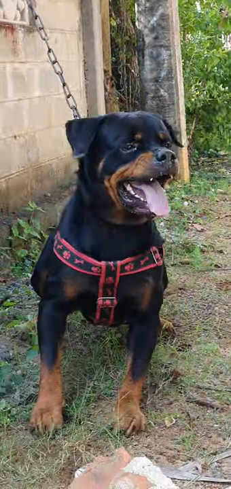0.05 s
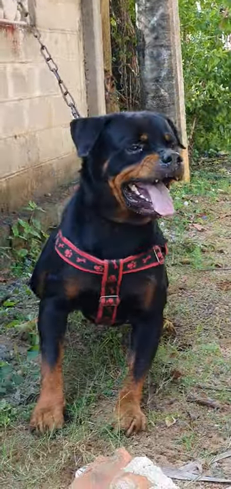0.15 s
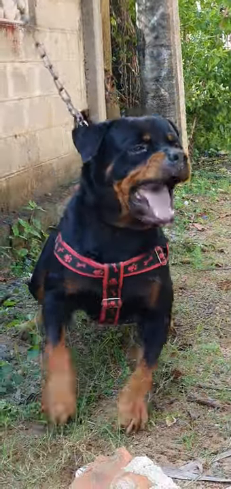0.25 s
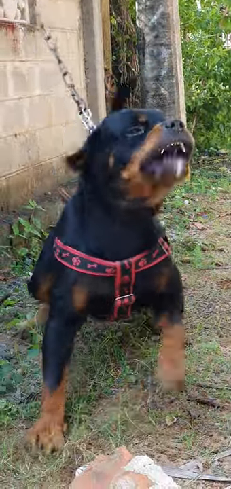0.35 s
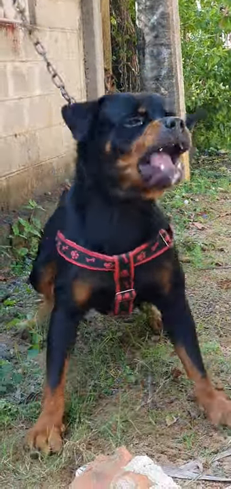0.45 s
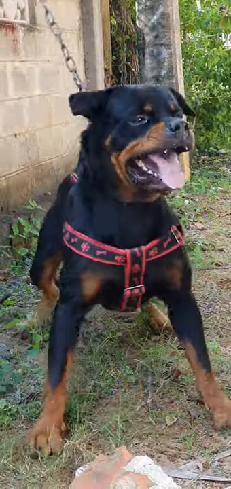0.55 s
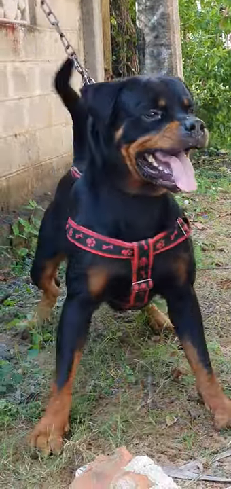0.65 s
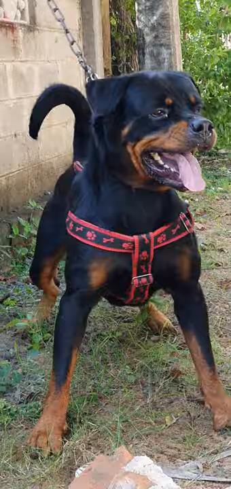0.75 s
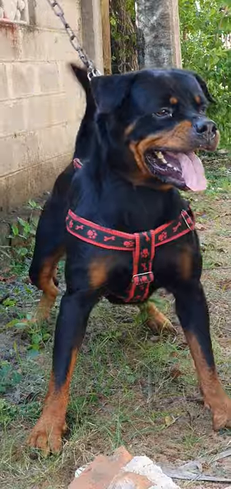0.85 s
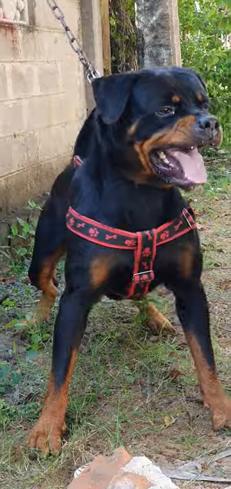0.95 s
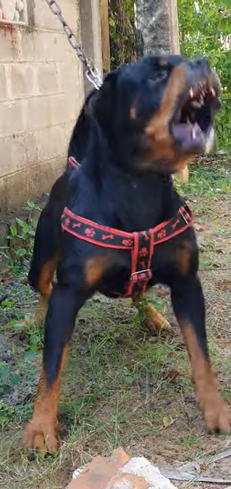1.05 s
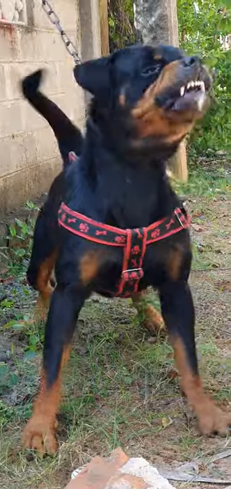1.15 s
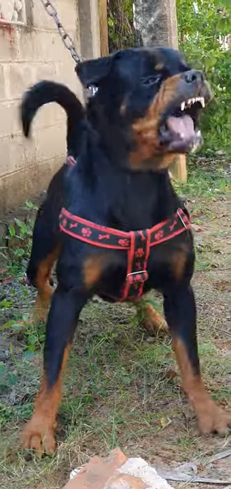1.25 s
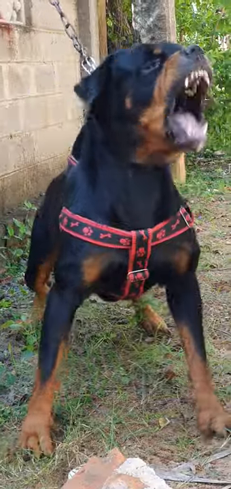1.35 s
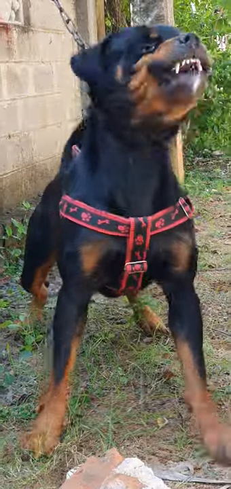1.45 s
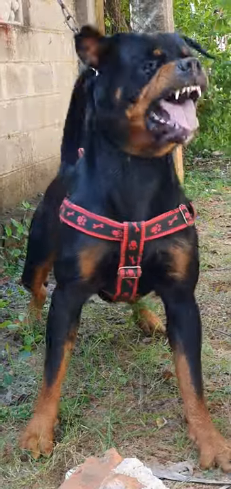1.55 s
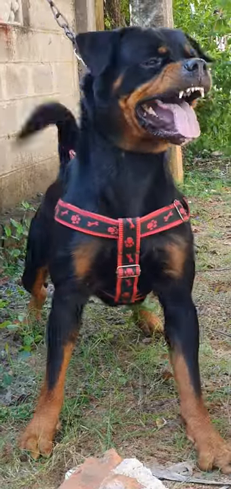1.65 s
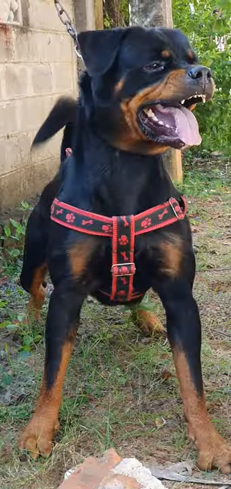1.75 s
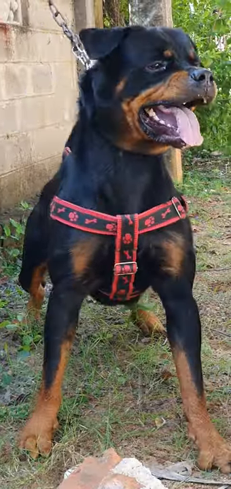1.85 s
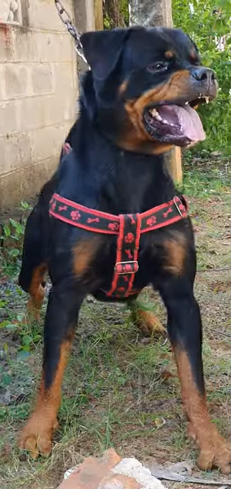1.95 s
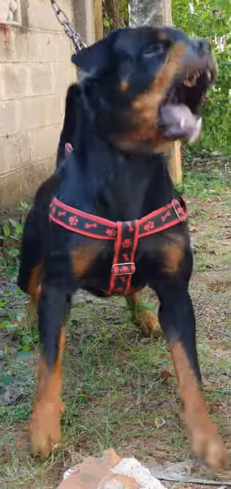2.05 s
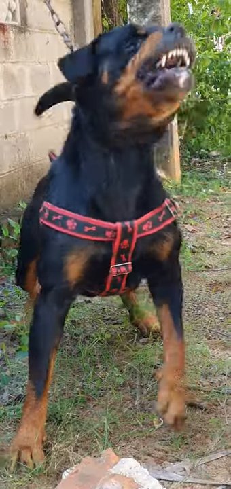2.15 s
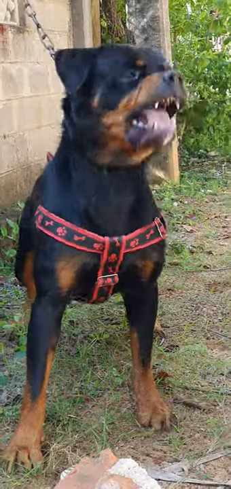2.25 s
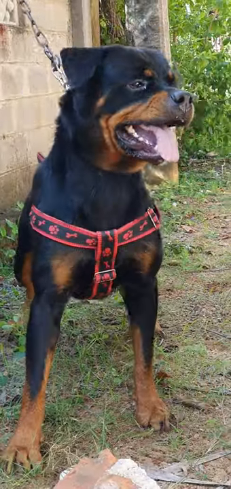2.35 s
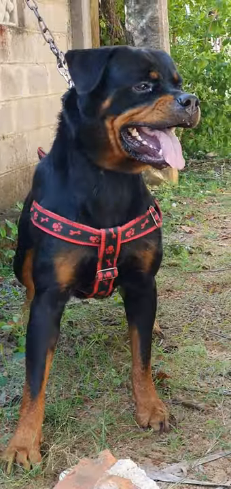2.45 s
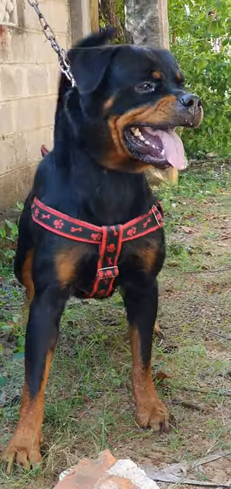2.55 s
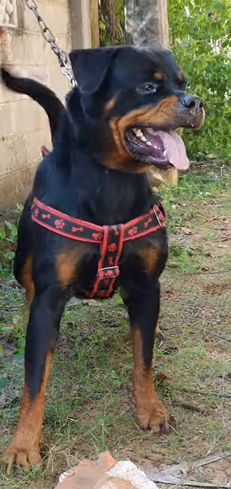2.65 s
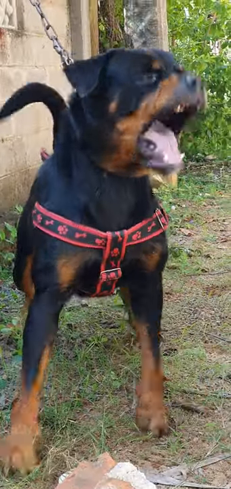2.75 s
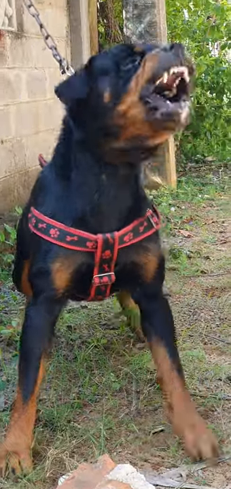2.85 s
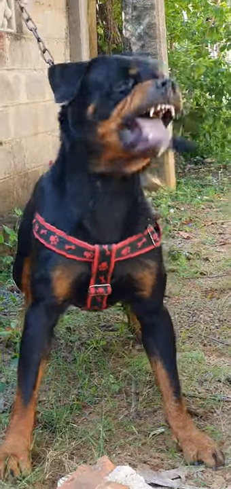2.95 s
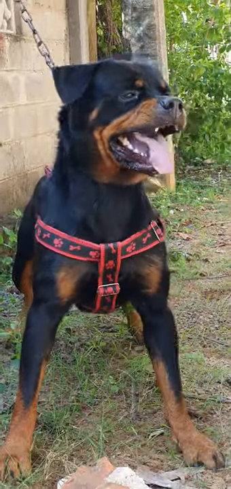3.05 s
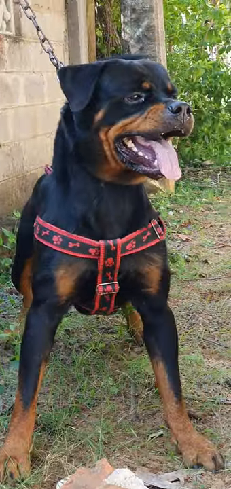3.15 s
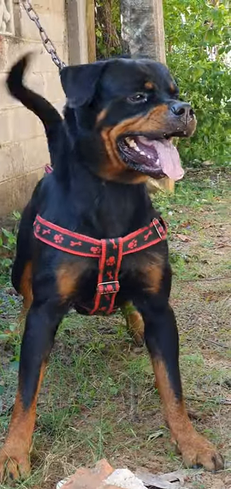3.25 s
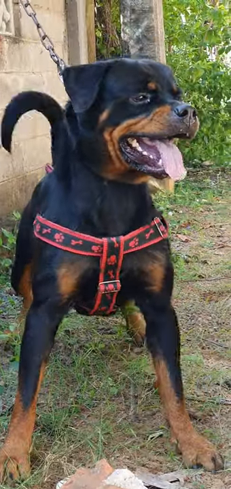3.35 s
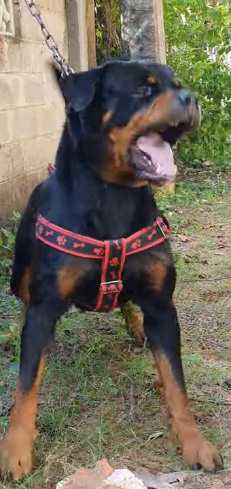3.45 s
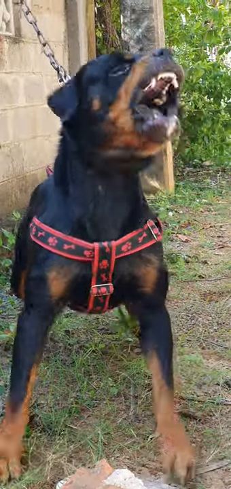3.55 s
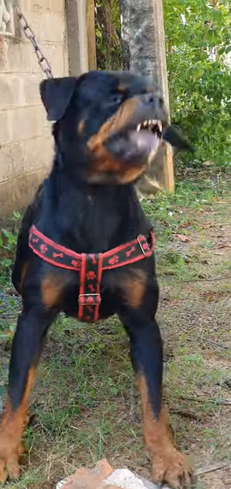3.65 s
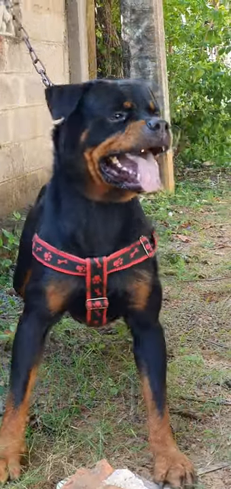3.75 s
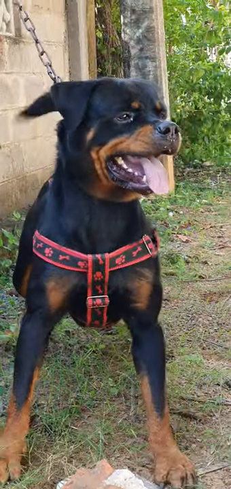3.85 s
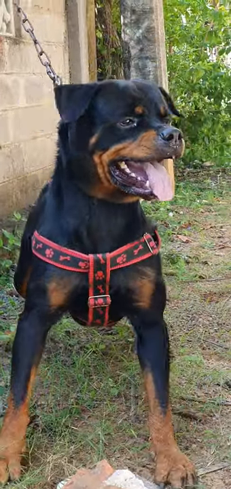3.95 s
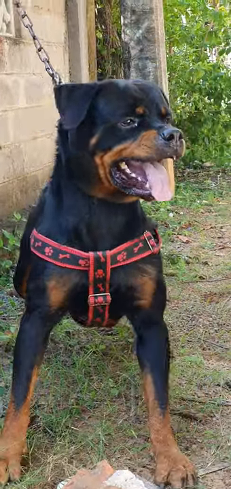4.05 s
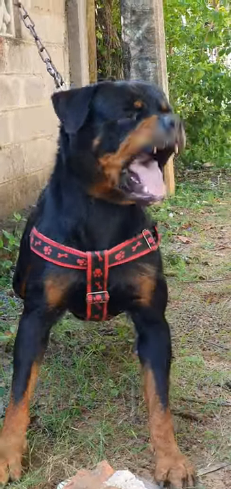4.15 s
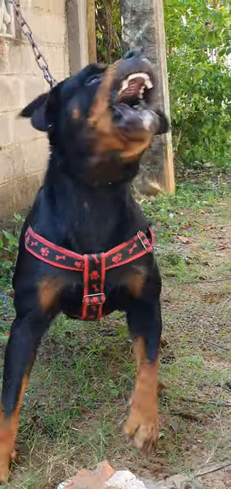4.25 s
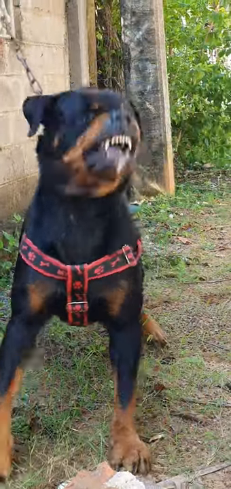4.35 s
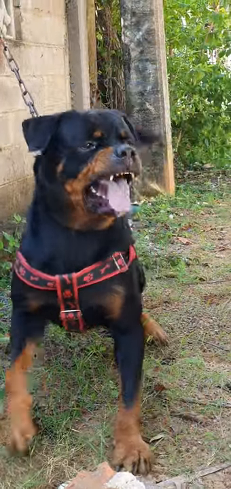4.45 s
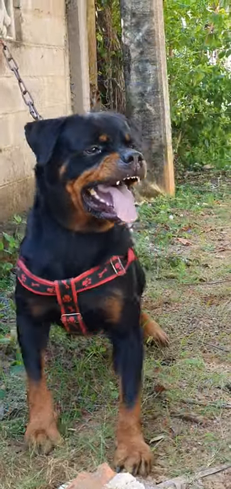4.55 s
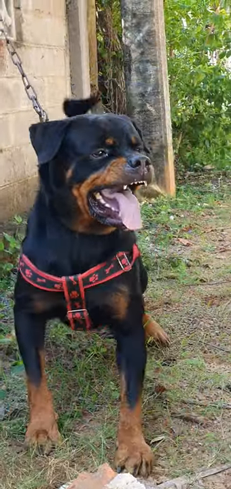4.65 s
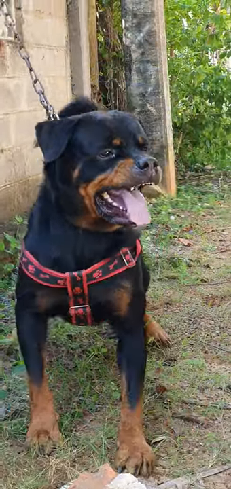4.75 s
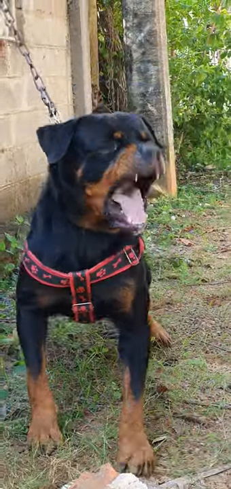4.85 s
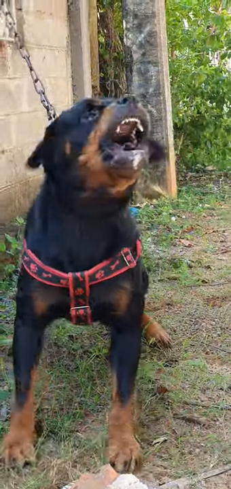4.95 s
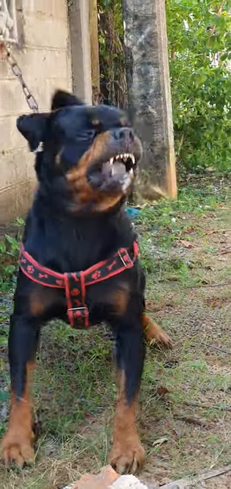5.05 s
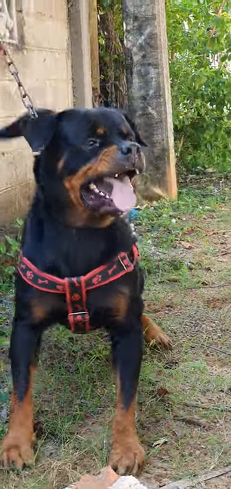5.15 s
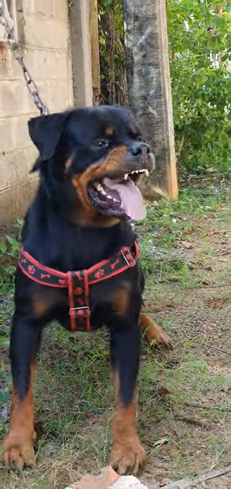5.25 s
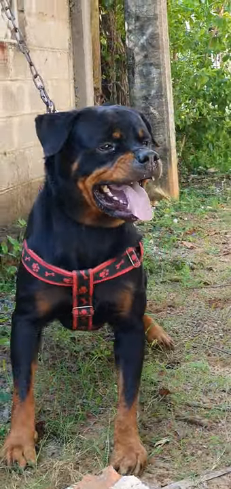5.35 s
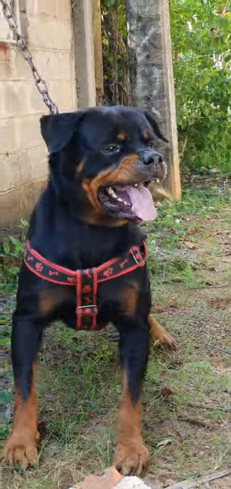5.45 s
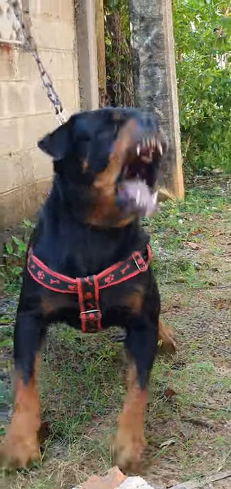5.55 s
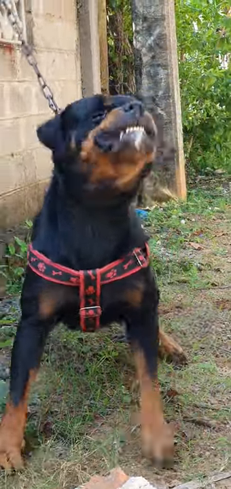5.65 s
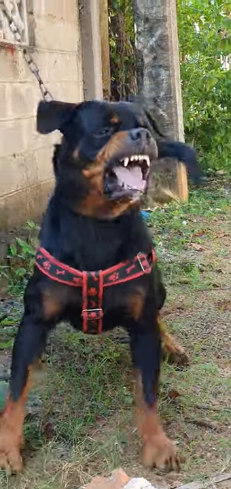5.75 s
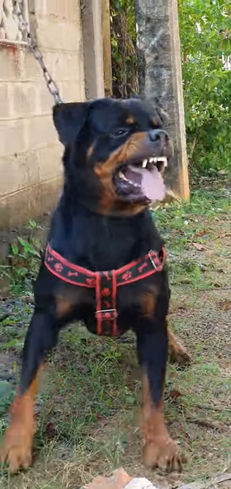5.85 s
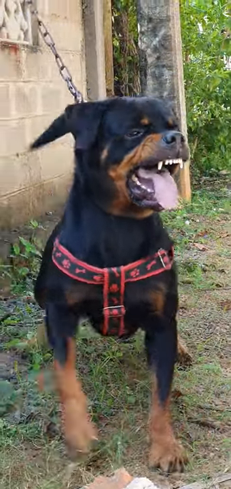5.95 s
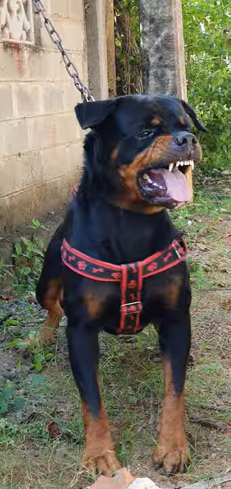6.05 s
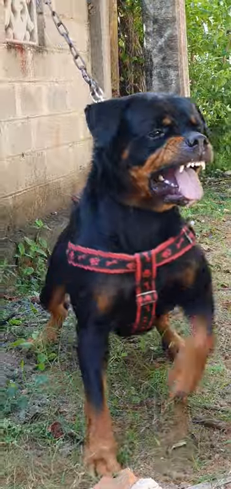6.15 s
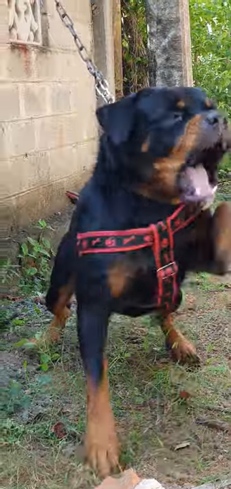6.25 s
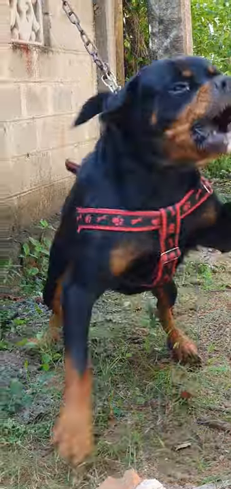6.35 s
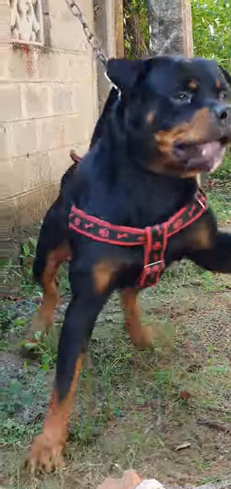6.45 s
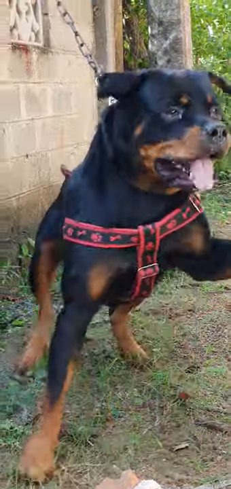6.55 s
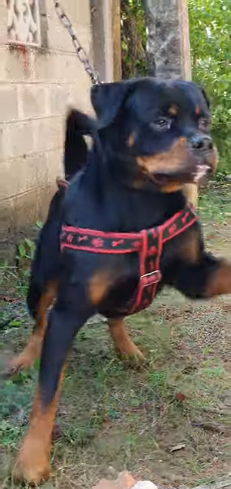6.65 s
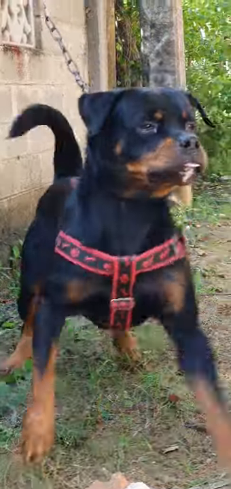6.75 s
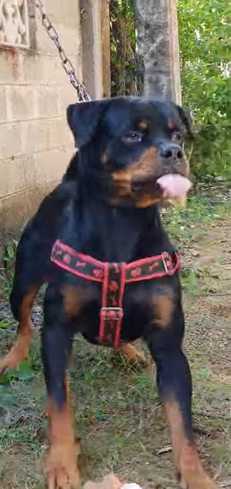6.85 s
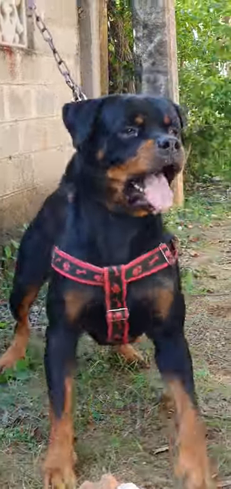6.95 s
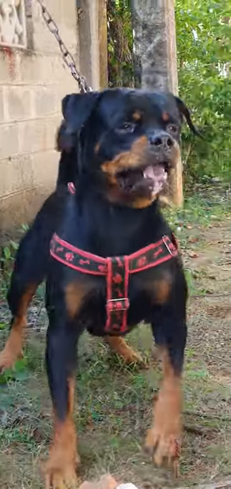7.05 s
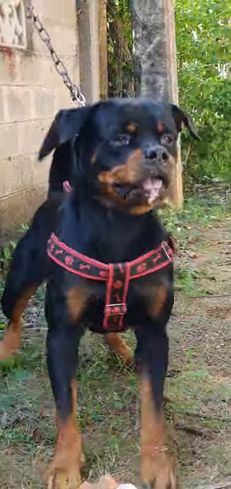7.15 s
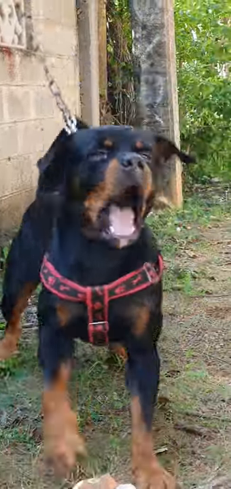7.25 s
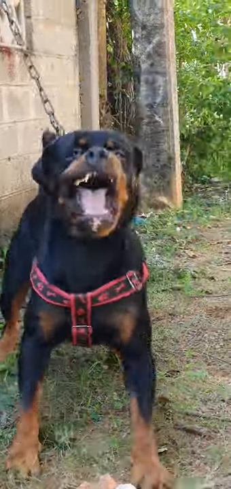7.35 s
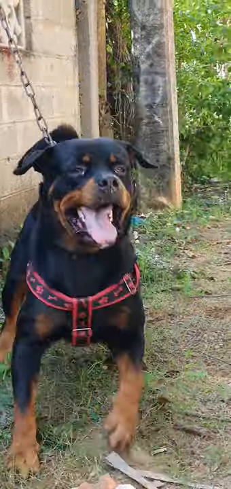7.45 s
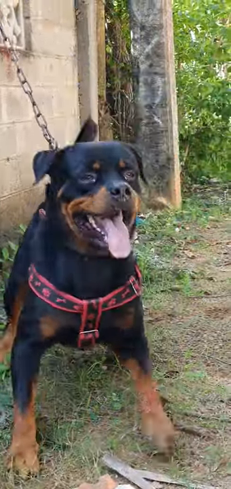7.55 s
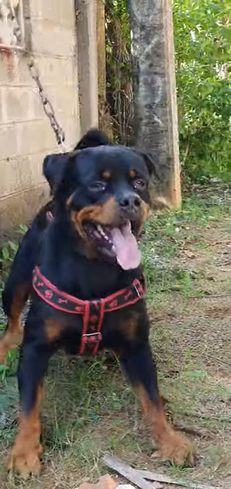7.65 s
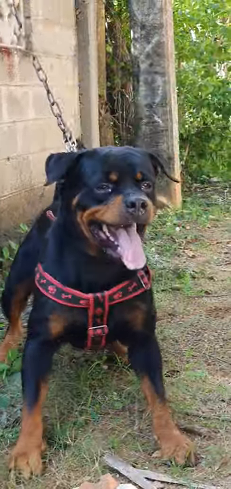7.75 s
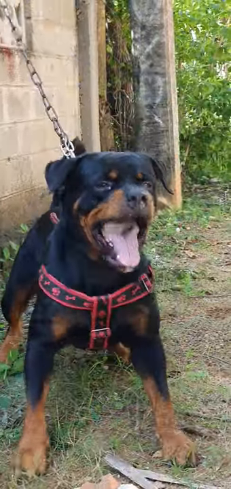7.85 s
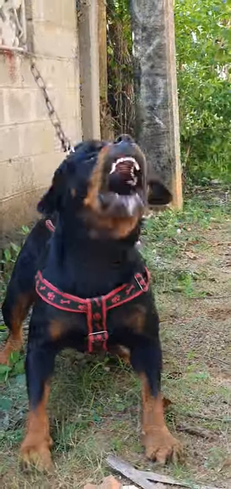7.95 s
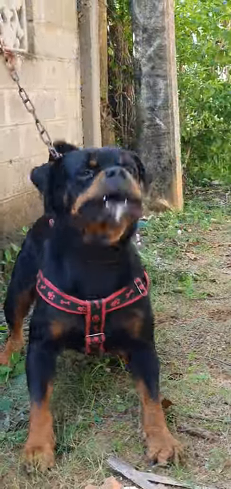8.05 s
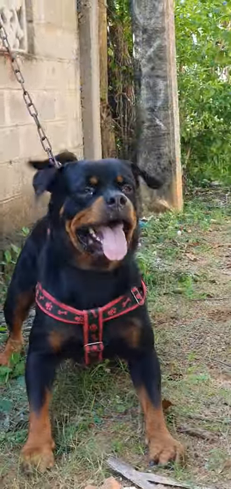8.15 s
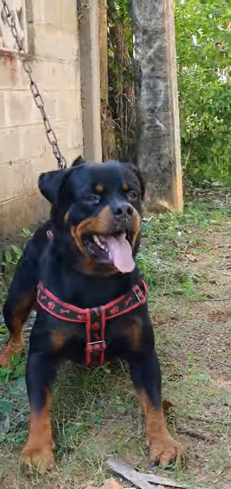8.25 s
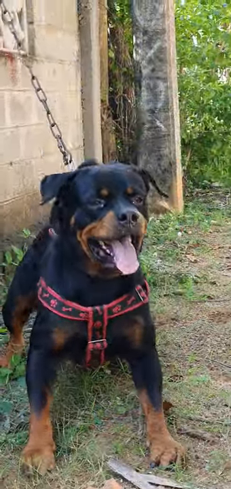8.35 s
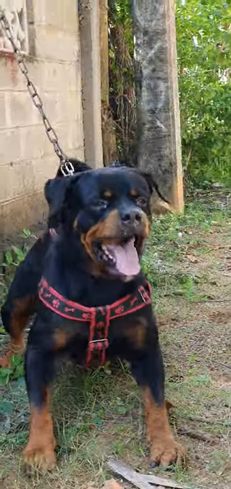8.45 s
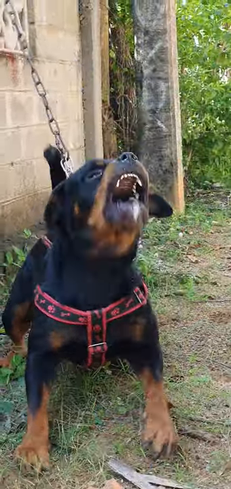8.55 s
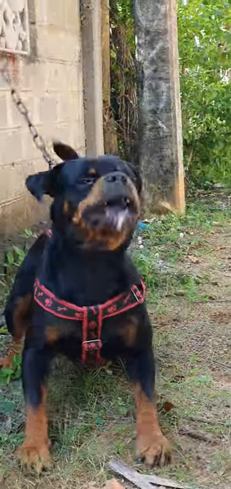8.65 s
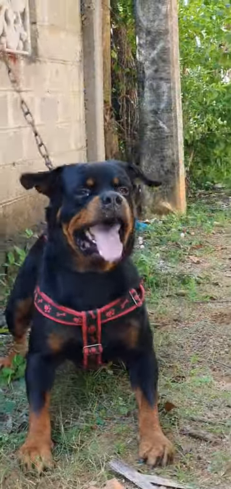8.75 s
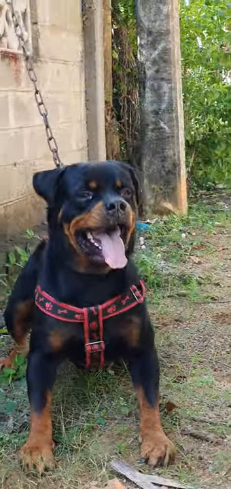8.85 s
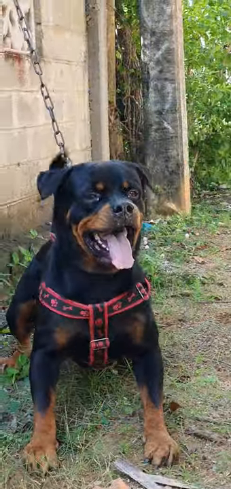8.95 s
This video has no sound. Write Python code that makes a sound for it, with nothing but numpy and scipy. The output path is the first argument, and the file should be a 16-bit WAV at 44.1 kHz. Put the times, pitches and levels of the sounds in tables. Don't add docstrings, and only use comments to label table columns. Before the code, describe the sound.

The scene opens on the tail of a high yelp, then a large dog close by barks hoarsely at about 0.3 seconds. Another bark follows at 1.0 and a quick one at 1.3, running into two clear yelps from a second dog by 1.8. The big dog continues at roughly 2.0, 2.7 and 3.5, each short bark rising, closing off and usually followed by a raspy gasp. Low growls murmur near 0.7 and 3.3. From 3.8 to 4.5 yelps cluster around a bark, then both dogs alternate and overlap through 9 seconds, with the last strong bark at 8.5 and a weak yelp at the end. A distant dog yaps faintly throughout and whines thinly near 0.1, 2.3 to 3.3 and 4.6. Walls return a short fading echo over gentle leaf hiss, low rumble and a far idling engine.

```python
import sys
import numpy as np
from scipy import signal
from scipy.fft import rfft, irfft
from scipy.io import wavfile
from scipy.ndimage import uniform_filter1d, minimum_filter1d

SR = 44100
rng = np.random.default_rng(int(sys.argv[2]) if len(sys.argv) > 2 else 0)


def to_linear_factor(level_db):
    exponent = np.asarray(level_db, float) / 20
    return 10 ** exponent


def master(y):
    cut = np.clip(np.atleast_2d(y).T, -1, 1)
    pcm = np.round(cut * 32767)
    wavfile.write(sys.argv[1], SR, pcm.astype(np.int16))


N = 396900

# start_s, rise_s (to the highest pitch), fall_s (from there to the end), level_db, top_pitch_hz
BIG_BARKS = [(0.27, .09, .13, -9.5, 547), (0.984, .085, .16, -7.5, 501), (1.303, .098, .075, -7, 544),
             (2.018, 0.096, 0.13, -8, 547.7), (2.74, 0.086, 0.14, -8.5, 554.3),
             (3.456, 0.081, 0.12, -6.5, 527), (4.181, 0.079, .12, -11.5, 491.4),
             (4.872, .08, 0.12, -8, 533.5), (5.539, .08, .1, -9, 534.8), (6.254, 0.1, 0.089, -9, 472.5),
             (7.234, 0.065, .11, -11, 450.5), (7.873, .075, 0.13, -10.5, 479.3),
             (8.496, 0.094, 0.084, -9, 542)]
# frequency_hz, level_db (per Hz)
SMALL_TEETH = [(2060, -7.5), (3500, 1.5), (4700, -13), (5880, 3), (7500, -1.5), (10100, -13.5), (12100, -3),
               (15600, -19.5)]


def in_time(table):
    s, *columns = np.transpose(table)
    first = max(int(s[0] * SR), 0)
    t = np.arange(first, min(int(s[-1] * SR), N)) / SR
    return first, len(t), [np.interp(t, s, c) for c in columns]


def colour(x, spectrum):
    size = x.shape[-1]
    hz = np.arange(size // 2 + 1) * SR / size + 1
    points = np.array(spectrum)
    gain_db = np.interp(np.log(hz), np.log(points[:, 0]), points[:, 1])
    return irfft(rfft(x) * to_linear_factor(gain_db), size)


def cut(x, hz, kind):
    return signal.sosfilt(signal.butter(4, hz, kind, fs=SR, output="sos"), x)


def wobble(size, hz):
    slow = cut(rng.standard_normal(size + 2000), hz, "low")[2000:]
    return slow / slow.std()


def evened(x):
    return x / np.sqrt(uniform_filter1d(x ** 2, size=1100) + 1e-12)


def yard():
    # frequency_hz, level_db (per Hz)
    yard_air = [(12, -38), (20, -5), (116, -7.5), (202, -10.5), (465, -21.5), (550, -14.5), (687, -16.5),
                (790, -23.5), (934, -20), (2280, -18.5), (2690, -27), (3180, -33), (15600, -54)]
    # frequency_hz, level_db (rms)
    engine = [(48.4, -78.5), (102.3, -80), (129.2, -57)]
    shared, left, right = colour(rng.standard_normal((3, N)), yard_air)
    own = cut(np.array([left, right]), 410, "high")
    air = shared + .8 * own + .2 * np.array([left, -left])
    air *= to_linear_factor(1.2 * wobble(N, 4))
    drone = np.zeros(N)
    for hz, db in engine:
        turns = hz * np.cumsum(1 + 0.027 * wobble(N, 3)) / SR
        drone += to_linear_factor(db - 3.5) * np.sin(2 * np.pi * turns)
    return to_linear_factor(-49) * air / air.std() + drone


def placed(x, wet_db):
    t60_s = 0.48
    t = np.arange(int(.7 * SR)) / SR
    tail = rng.standard_normal((2, len(t))) * (t > .02) * to_linear_factor(wet_db - 60 * t / t60_s)
    tail = cut(tail, 6000, "low") / np.sqrt(t60_s * SR / 8.0)
    return x + signal.fftconvolve(x, tail, axes=1)[:, :N]


def hum(calls, overtones_db, jitter, flutter_db):
    out = np.zeros(N)
    for table in calls:
        first, size, (pitch, level_db) = in_time(table)
        phase = 2 * np.pi * np.cumsum(pitch * (1 + jitter * wobble(size, 28))) / SR
        tone = sum(to_linear_factor(db) * np.sin((k + 1) * phase) for k, db in enumerate(overtones_db))
        fade = signal.windows.tukey(size, .3)
        level = to_linear_factor(level_db + flutter_db * wobble(size, 37.5))
        out[first:first + size] += np.sqrt(2) * fade * level * tone
    return out


def held(calls, hz_per_s, db_per_s):
    notes = []
    for s, long, hz, db in calls:
        half_db = db_per_s * long / 2
        notes.append([(s, hz, db - half_db), (s + long, hz + hz_per_s * long, db + half_db)])
    return notes


def arches(calls, course, bright_db):
    stage, level_db, share, open_db, *jaw_share = np.transpose(course)
    tables = []
    for (s, rise, fall, db, hz, *gape), bright in zip(calls, bright_db):
        time_s = s + rise + stage * np.where(stage < 0, rise, fall)
        columns = [time_s, db + level_db, hz * share, bright + open_db]
        columns += [jaw_hz * part for jaw_hz, part in zip(gape, jaw_share)]
        tables.append(np.transpose(columns))
    return tables


def jaw(x, centre_hz, width_hz, boost):
    out, state, r = np.zeros_like(x), np.zeros(2), np.exp(-np.pi * width_hz / SR)
    for i in range(0, len(x), 128):
        poles = [1, -2 * r * np.cos(2 * np.pi * centre_hz[i] / SR), r * r]
        zeros = [(1 - r * r) / 2, 0, (r * r - 1) / 2]
        out[i:i + 128], state = signal.lfilter(zeros, poles, x[i:i + 128], zi=state)
    return x + boost * out


def bark(table, throat, at_top, rising, falling, jitter, halving, teeth, hiss_db, chest_db):
    first, size, (level_db, pitch, bright_db, *jaw_hz) = in_time(table)
    pitch = uniform_filter1d(pitch, size=900, mode="nearest")
    level_db = level_db + 1.1 * wobble(size, 35)

    below_top = 1 - pitch / pitch.max()
    late = np.clip((np.arange(size) - pitch.argmax()) / SR / .02 + 1, 0, 1)
    hoarse = at_top + (1 - late) * rising * below_top + late * falling * np.sqrt(below_top + .015)
    hoarse = np.clip(hoarse, 0, .9)

    steady = 2 * np.pi * np.cumsum(pitch) / SR
    phase = steady + 2 * np.pi * np.cumsum(pitch * jitter * hoarse * wobble(size, 118.0)) / SR
    order = np.arange(1, 15)[:, None]
    partials = np.cos(order * phase + 0.3514 * order ** 2) * (order * pitch < 4000)
    buzz = np.sum(partials, axis=0) * np.sqrt(2 * pitch / 4000)
    buzz += cut(buzz * halving * hoarse * np.cos(phase / 2), 570, "high")

    air = rng.standard_normal(size) * (1 + .6 * np.cos(phase)) * to_linear_factor(1.5 * wobble(size, 60))
    rasp = cut(cut(air, 3500, "low"), 440, "high")
    folds = np.sqrt(1 - hoarse ** 2) * buzz + 2.4 * hoarse * rasp
    if jaw_hz:
        folds = jaw(folds, jaw_hz[0], width_hz=300, boost=5)
        folds = jaw(folds, jaw_hz[0] * 1.232 + 100, width_hz=230, boost=.8)
    low, high = colour(np.array([cut(folds, 1600, "low"), cut(folds, 1600, "high")]), throat)
    mouth = to_linear_factor(level_db) * (evened(low) + to_linear_factor(bright_db) * evened(high))

    alike, own = colour(np.array([air, air[::-1]]) * to_linear_factor(2.2 * wobble(size, 23)), teeth)
    hiss = alike + 0.51 * own * [[1], [-1]]
    hiss_level = to_linear_factor(hiss_db) * uniform_filter1d(to_linear_factor(level_db + 0.27 * bright_db), size=1300)
    mouth = mouth + hiss_level * hiss / hiss.std()

    from_start = np.arange(size) + (first == 0) * 600
    to_end = np.arange(size)[::-1] + (first + size >= N) * 600
    edge = np.minimum(1, np.minimum(from_start, to_end) / 600) ** 2
    chest = to_linear_factor(chest_db) * np.cos((steady + phase) / 2)
    return first, edge * (mouth + chest)


def dog(barks, throat, hoarse, pan_db, lag, near_db, near_t60, **voice):
    out, t = np.zeros((2, N + 3000)), np.arange(1800) / SR
    delays = 20 + np.array([[-lag / 2], [lag / 2]])
    direct = np.sinc(np.arange(41) - delays) * to_linear_factor(np.array([[pan_db / 2], [-pan_db / 2]]))
    for table, at_top in zip(barks, hoarse):
        first, sound = bark(table, throat, at_top, **voice)
        path = to_linear_factor(near_db - 60 * t / near_t60) * cut(rng.standard_normal((2, 1800)), 577, "high")
        path /= np.sqrt(near_t60 * SR / 55.0)
        path[:, :41] = direct
        heard = signal.fftconvolve(sound, path, axes=1)
        heard *= sound.std() / heard.std(axis=1, keepdims=True) * direct.sum(axis=1, keepdims=True)
        out[:, first:first + heard.shape[1]] += heard
    return out[:, 20:N + 20]


def far_dog():
    # start_s, rise_s, fall_s, level_db, top_pitch_hz
    yaps = [(.635, .11, 0.082, -42.5, 792.5), (.875, 0.13, 0.04, -35, 780),
            (1.93, 0.097, 0.045, -46.5, 722), (3.09, 0.11, 0.056, -53, 885), (3.34, .11, .05, -40.5, 800),
            (4.06, .1, 0.082, -47.5, 773), (5.47, 0.048, 0.078, -40.5, 794), (6.895, 0.051, 0.15, -45, 813),
            (7.14, 0.073, 0.033, -42.5, 723), (8.15, 0.14, 0.1, -46, 680), (8.41, 0.044, 0.09, -44.5, 708),
            (8.735, 0.072, 0.12, -45.5, 654), (8.9, 0.052, .04, -43, 735)]
    # stage (-1 start, 0 top, 1 end), level_db, share of top pitch, brightness_db
    yap_course = [
        (-1, -14, .74, -6),
        (-.7, -4, .83, -3),
        (-.3, -1, .95, 0),
        (0, 0, 1, 1),
        (1, -9, .94, -3),
    ]
    yap_bright_db = [7.5, -1.5, -1.5, 19, 7, 1, -8, -9.5, -19, -21, -7, -20, -0.5]
    yap_hoarse = [.6, .3, .35, .55, .4, .35, .2, .45, .2, .2, .3, .2, .3]
    # frequency_hz, level_db (per Hz)
    far_throat = [(240, -66), (400, -31), (569, -4), (705, 7), (1170, -13.5), (1380, -12.5), (1660, -21),
                  (2550, -16), (3580, -43.5), (15600, 3.5)]
    # start_s, length_s, pitch_hz, level_db
    whines = [
        (.09, 0.31, 538, -56.5),
        (2.28, 1, 561, -62),
        (4.58, 0.28, 551, -54),
    ]
    calls = arches(yaps, yap_course, yap_bright_db)
    out = dog(calls, far_throat, yap_hoarse, pan_db=0.18, lag=1.7, near_db=-9.5, near_t60=0.14,
              rising=0, falling=.6, jitter=.09, halving=.3, teeth=SMALL_TEETH, chest_db=-58, hiss_db=-27.0)
    out += hum(held(whines, 0, 0), [2, -9, -40, -10.5], jitter=0.003, flutter_db=-4)
    return out


def second_dog():
    # start_s, rise_s, fall_s, level_db, top_pitch_hz
    yelps = [(-.1, 0.11, .11, -11, 690.5), (1.382, .135, .13, -13.5, 739), (1.672, .11, 0.14, -15.5, 705.6),
             (3.828, 0.1, 0.089, -10, 719.6), (4.16, .11, 0.066, -11, 710), (4.385, .12, .12, -13.5, 675),
             (5.108, 0.14, .09, -13, 689), (5.695, .11, 0.1, -10.5, 684), (5.995, 0.11, 0.11, -14, 651),
             (6.59, 0.12, 0.066, -13.5, 697), (7.23, .115, 0.094, -12.5, 723),
             (7.625, .125, 0.091, -14.5, 687), (7.91, 0.091, 0.079, -20, 633),
             (8.236, .09, 0.12, -14.5, 641), (8.95, 0.092, .09, -25.5, 694)]
    # stage (-1 start, 0 top, 1 end), level_db, share of top pitch, brightness_db
    yelp_course = [
        (-1, -38, .45, -14),
        (-.75, -13, .6, 0),
        (-.55, -2, .81, 2),
        (-.3, 0, .92, 0),
        (0, -2, 1, 0),
        (.22, -5, .86, 0),
        (.5, -17, .52, -4),
        (1, -42, .26, -16),
    ]
    yelp_bright_db = [1.5, -1, -1, -2, -5, -7.5, -3.5, -4, -1.5, 2, 3.5, 3.5, 6, 0.5, -12]
    yelp_hoarse = [.3, .25, .22, .12, .2, .15, .2, .15, .12, .12, .15, .15, .2, .05, .2]
    # frequency_hz, level_db (per Hz)
    yelp_throat = [(180, -53), (300, -7), (469, -13.5), (574, -2.5), (645, 5.5), (915, -20.5), (1310, -5.5),
                   (1570, -10), (1970, -13), (2140, -9), (3040, -11), (3450, -32), (3800, -37.5),
                   (4940, -69), (8360, -120)]
    # start_s, length_s, starting_pitch_hz, level_db
    growl_calls = [
        (.72, 0.78, 118, -49),
        (1.56, 0.17, 154, -50),
        (3.34, 0.57, 117.2, -51),
        (4.05, 0.16, 117.4, -61),
        (6.4, 0.23, 141, -53.5),
        (8.07, 0.14, 138, -60),
        (8.72, 0.37, 112, -54.5),
    ]
    calls = arches(yelps, yelp_course, yelp_bright_db)
    voice = dog(calls, yelp_throat, yelp_hoarse, pan_db=-0.75, lag=0.78, near_db=-0.85, near_t60=0.034,
                rising=.3, falling=1.15, jitter=.07, halving=1.5, teeth=SMALL_TEETH, chest_db=-43, hiss_db=-26)
    growl = hum(held(growl_calls, hz_per_s=34, db_per_s=3), [0, -2, -9], jitter=.04, flutter_db=2)
    return voice + growl


def gasps():
    # length_s, level_db
    after_bark = [(0.21, -38.5), (0.25, -69), (.12, -44), (0.2, -39), (0.21, -41.5), (0.24, -40.5),
                  (0.26, -45), (0.19, -40.5), (0.29, -49), (0.2, -40.5), (0.2, -43.5), (0.29, -53),
                  (0.35, -42)]
    # start_s, length_s, level_db
    inhale = (1.243, .15, -38)
    # frequency_hz, level_db (per Hz)
    breath_colour = [(530, -10), (900, -83), (1120, -16.5), (1630, -8), (2020, -9.5), (4090, -15),
                     (10100, -22.5), (12000, -18.5), (15600, -32)]
    lead_s, sag_db_per_s = 0.06, 33
    t, swell = np.arange(N) / SR, np.zeros(N)
    breaths = [(s + rise + fall - lead_s, *gasp) for (s, rise, fall, *_), gasp in zip(BIG_BARKS, after_bark)]
    for start_s, long_s, db in breaths + [inhale]:
        since = t - start_s
        gate = np.clip(since / 0.054, 0, 1) * np.clip((long_s - since) / 0.096, 0, 1) ** 2
        swell += gate * to_linear_factor(db - sag_db_per_s * np.clip(since, 0, long_s))
    shared, left, right = colour(rng.standard_normal((3, N)), breath_colour)
    air = shared + np.array([left, right])
    flutter = to_linear_factor(1.2 * wobble(N, 18))
    return flutter * swell * air / air.std()


def big_dog():
    # stage (-1 start, 0 top, 1 end), level_db, share of top pitch, brightness_db, share of jaw ring
    bark_course = [
        (-1, -21.5, .6, -9, 1.44),
        (-.75, -8.5, 0.64, 0, 1.04),
        (-.35, -1, .9, -2, 1.05),
        (-.18, -2.5, .98, -5.5, 1.01),
        (0, -2, 1, -5, 0.99),
        (.14, -1, .98, -11, .98),
        (.3, -3, .9, -9.5, 0.84),
        (.65, -12, 0.66, -16, 0.6),
        (0.97, -33.5, 0.644, -30, 0.47),
    ]
    bark_bright_db = [1, -0.5, -2, -1.5, 0.5, 5, 5, -2.5, -1, .5, 5, 2, -1.5]
    gape_hz = [960, 1040, 1000, 1015, 1070, 1054, 800, 917, 920, 776, 680, 936, 910]
    bark_hoarse = [.45, .5, .15, .12, .08, .45, .45, .3, .15, .6, .4, .55, .4]
    # frequency_hz, level_db (per Hz)
    big_throat = [(180, -103), (300, -22.5), (521, 3.5), (868, -3.5), (1050, -4.5), (1220, -7),
                  (1690, -11.5), (2010, -2), (3800, -19), (4940, -89), (8360, -120)]
    # frequency_hz, level_db (per Hz)
    big_teeth = [(2060, -26), (3500, -38), (3770, -3), (4020, -2.5), (7090, -6.5), (10200, -24.5),
                 (13300, -10.5), (15600, -36)]
    with_jaw = [(*row, hz) for row, hz in zip(BIG_BARKS, gape_hz)]
    calls = arches(with_jaw, bark_course, bark_bright_db)
    return dog(calls, big_throat, bark_hoarse, pan_db=0.33, lag=5.42, near_db=-4.0, near_t60=0.022,
               rising=2.1, falling=.8, jitter=.1, halving=.5, teeth=big_teeth, chest_db=-40, hiss_db=-20.5)


def scene():
    far = placed(far_dog(), wet_db=0.5)
    second = placed(second_dog(), wet_db=-18.5)
    big = placed(big_dog(), wet_db=-13.5)
    return yard() + far + second + gasps() + big


def band_limit(x):
    return signal.sosfilt(signal.butter(12, 15710, fs=SR, output="sos"), x)


def record(dry):
    room_left = np.minimum(1, .97 / (np.abs(dry).max(axis=0) + 1e-9))
    gain = uniform_filter1d(minimum_filter1d(room_left, size=161), size=121)
    return band_limit(dry * gain)


dry = scene()
out = record(dry)
master(out)
```